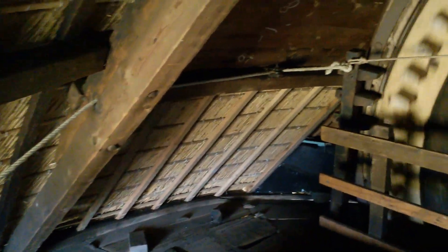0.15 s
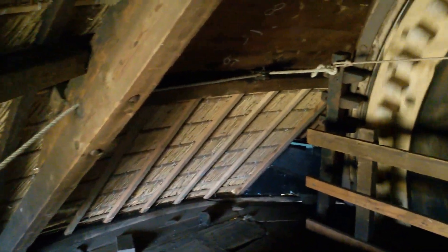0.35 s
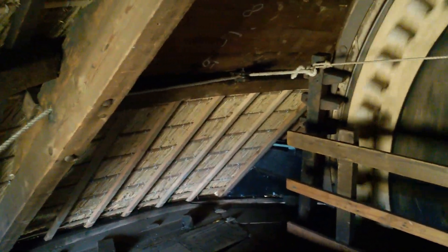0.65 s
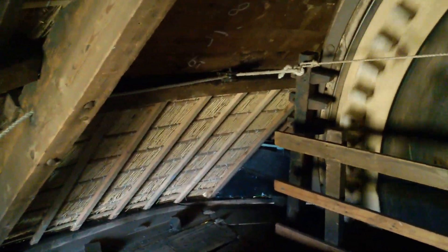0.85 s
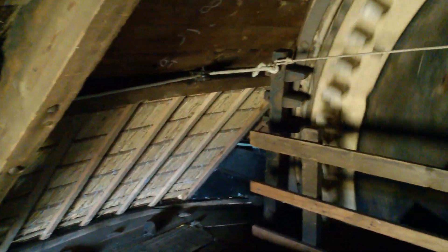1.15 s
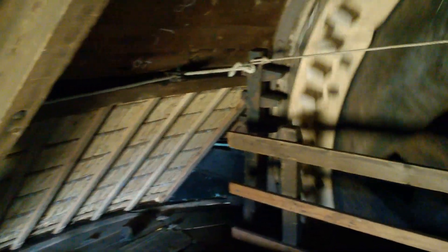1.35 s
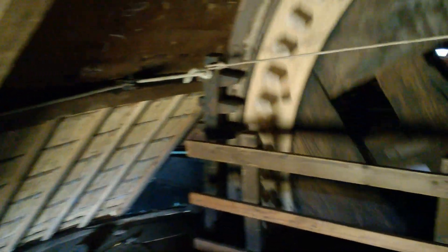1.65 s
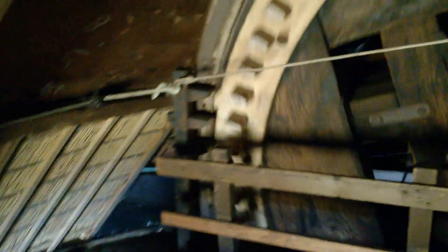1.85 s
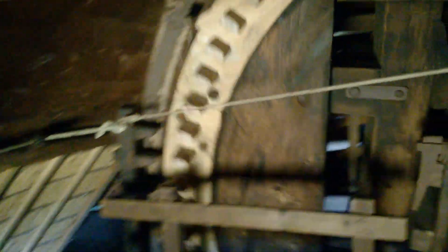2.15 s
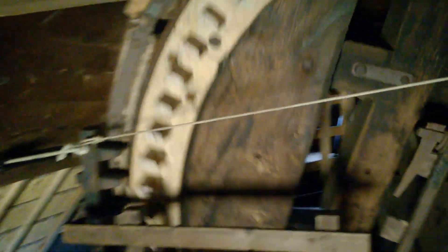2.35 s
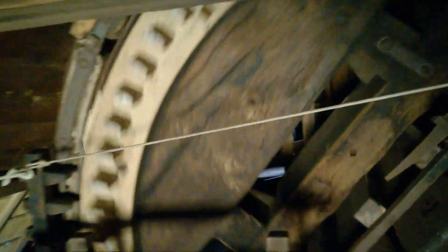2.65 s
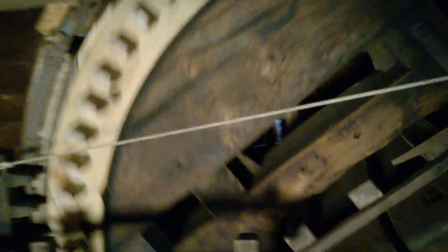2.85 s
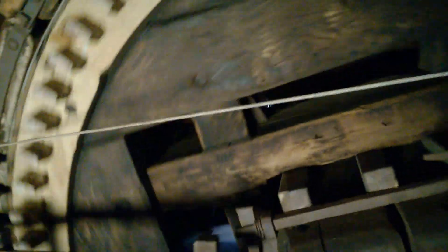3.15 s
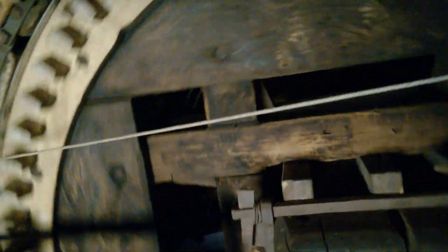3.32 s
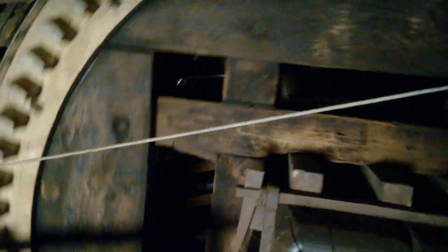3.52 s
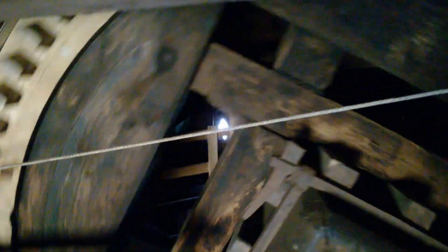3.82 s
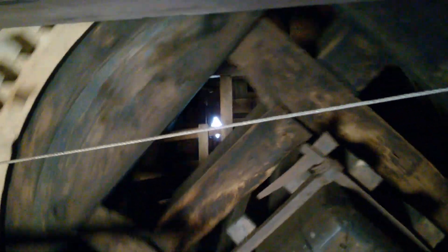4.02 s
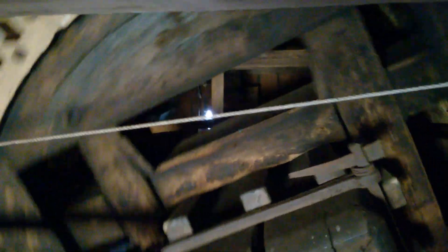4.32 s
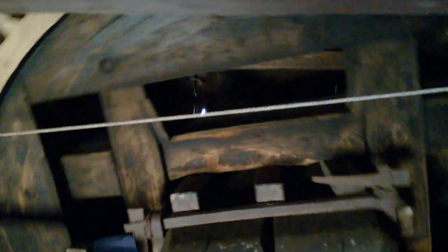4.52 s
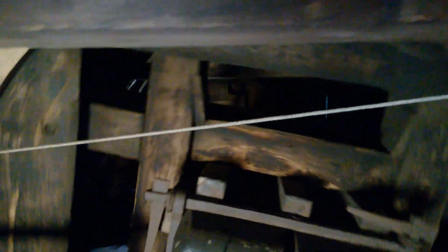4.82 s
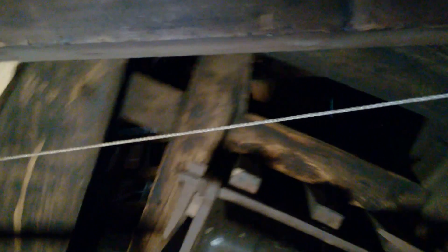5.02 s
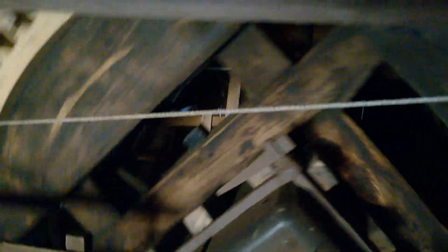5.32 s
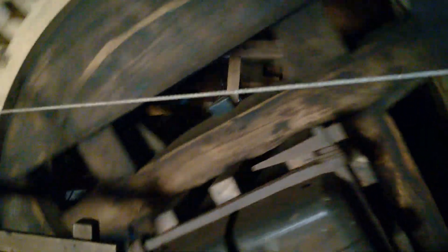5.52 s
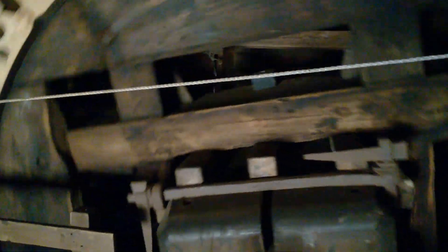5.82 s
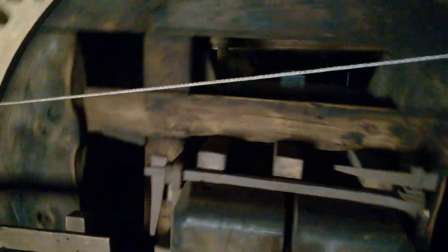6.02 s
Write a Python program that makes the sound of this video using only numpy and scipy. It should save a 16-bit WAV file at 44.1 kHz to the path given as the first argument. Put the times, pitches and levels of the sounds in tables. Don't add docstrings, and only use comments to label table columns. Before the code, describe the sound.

Close, dry wooden gear knocks, ticks and soft low thuds from a turning mill wheel, above a shuddering low-frequency rumble in a small timber loft.

```python
import sys
import numpy as np
from scipy import signal
from scipy.fft import rfft, irfft
from scipy.io import wavfile
from scipy.ndimage import uniform_filter1d

SR = 44100
rng = np.random.default_rng(int(sys.argv[2]) if len(sys.argv) > 2 else 0)


def store_pcm(level_fs):
    pcm = np.round(np.clip(level_fs, -1, 1) * 32767).astype(np.int16)
    wavfile.write(sys.argv[1], SR, np.atleast_2d(pcm).T)


def volts_from_db(level):
    exponent = np.asarray(level, float) / 20
    return 10 ** exponent


N = 272097
SPAN = 8192
LEAD = .002
TIME = np.arange(SPAN) / SR
HZ = np.arange(SPAN // 2 + 1) * SR / SPAN


def unit(x):
    return x / np.sqrt(np.mean(x ** 2))


def walk(rate):
    k = int(SR / rate)
    steps = np.repeat(rng.standard_normal(N // k + 1), k)
    return unit(uniform_filter1d(uniform_filter1d(steps, k), k)[:N])


def shaped(points, size):
    hz, db = np.transpose(points)
    log_hz = np.log(np.arange(size // 2 + 1) * SR / size + 1)
    return irfft(rfft(rng.standard_normal(size)) * volts_from_db(np.interp(log_hz, np.log(hz), db)), size)


def colour_curve(hz, db):
    return volts_from_db(np.interp(np.log(HZ + 1), np.log(hz), db))


def add(out, x, s, db):
    i = int((s - LEAD) * SR)
    top = np.sqrt(2 * uniform_filter1d(x ** 2, SR // 200).max())
    out[i:i + SPAN] += (x * volts_from_db(db) / top)[:N - i]


def wind():
    # time in seconds, load on the tower in dB, sway re load in dB, tooth pressure in dB
    gusts = [(0.0, -26.5, -0.5, -49), (0.41, -25, -3, -45.5), (0.79, -26.5, -4.5, -54),
             (1.29, -19.5, -4, -49.5), (1.67, -31, -4, -43.5), (2.01, -20, -2, -50.5),
             (2.87, -27, -3.5, -50.5), (2.97, -27.5, -4, -47.5), (3.4, -15.5, -8, -52),
             (3.59, -25.5, -1.5, -43), (3.63, -17, -4, -47), (4.33, -32.5, 0, -57), (4.43, -45, -4, -56.5),
             (4.47, -28.5, -1, -48), (4.9, -19, -3.5, -53), (5.19, -29, -5.5, -55), (5.77, -25, -4.5, -48),
             (6.17, -30, -3.5, -57)]
    s, *columns = np.transpose(gusts)
    return [np.interp(np.arange(N) / SR, s, column) for column in columns]


def wavering(hz):
    turns = np.cumsum(hz * (1 + 0.05023 * walk(5))) / SR
    return -np.sqrt(2) * np.cos(2 * np.pi * turns)


def resonate(hz, width):
    peak = signal.tf2sos(*signal.iirpeak(hz, hz / width, fs=SR))
    return unit(signal.sosfilt(np.vstack([peak, peak, peak]), rng.standard_normal(N)))


def tower(load_db, share_db):
    sway_db = load_db + share_db + 3.0 * walk(9.7)
    shudder_db = load_db - 2 + 2.45 * walk(9)
    rumble_db = -37.5 + 0.51 * (load_db + 23) + 3 * walk(8)
    sway = volts_from_db(np.minimum(sway_db, -17)) * wavering(26.5)
    shudder = volts_from_db(np.minimum(shudder_db, -16)) * wavering(37)
    buffet = volts_from_db(-36.5) * resonate(53.0, 27.0)
    rumble = resonate(76, 30) + 0.43 * resonate(122.7, 70)
    return sway + shudder + buffet + volts_from_db(rumble_db - 3.5) * rumble


def aftershake(knocks):
    shake_s, db_per_db = .08, .33
    fade = np.exp(-1 / (shake_s * SR))
    power = signal.lfilter([1 - fade], [1, -fade], knocks ** 2)
    return db_per_db * 10 * np.log10(power / np.median(power) + .1)


def grind(db):
    # frequency in Hz, level in dB per Hz
    rub_colour = [(100, 5.5), (190, 6.5), (350, -5), (700, -11), (1300, -20.5), (2100, -21), (2900, -32),
                  (4200, -37), (6300, -37), (8000, -67)]
    grains = shaped(rub_colour + [(20000, -120)], N) * volts_from_db(1.4 * walk(18) + 2.5 * walk(70))
    grains = signal.sosfilt(signal.butter(2, 340, "high", fs=SR, output="sos"), grains)
    low = [(hz, level) for hz, level in rub_colour if 90 < hz < 500]
    drone = shaped([(38, -18.5), (55, 10.5)] + low + [(720, -47.5)], N)
    hiss = shaped([(1500, 2), (3000, 1.0), (6300, -2.5), (7500, -21.5), (16000, -9.0)], N)
    rubbing = volts_from_db(db - 0.7) * unit(grains)
    droning = volts_from_db(-41.5 + 1.75 * walk(6.05)) * unit(drone)
    return rubbing + droning + volts_from_db(-74.5 + walk(12) / 2) * unit(hiss)


def slip(length, rough_db):
    chatter = rng.standard_normal(SPAN) * volts_from_db(rough_db * rng.exponential(size=SPAN))
    since = np.maximum(TIME - LEAD, 0)
    bite = 1 - np.exp(-since / max(0.06 * length, 1e-5))
    let_go = np.exp(-(since / max(length, 2e-4)) ** 2)
    return rfft(chatter * (TIME >= LEAD) * bite * let_go)


def splinters(hits):
    # start in seconds, peak level in dB, air re edge in dB, slip length in seconds
    ticks = [(.036, -48, -24, 0.0059), (0.146, -52, -20, 0.017), (0.357, -58, -16, .017),
             (.55, -60, -11, .016), (0.623, -59, -14, .012), (1.029, -49, -10.5, 0.01),
             (1.386, -57, -12, .0097), (1.496, -47, -16, .025), (1.517, -50, -13, 0.017),
             (1.605, -52, -11, 0.042), (1.726, -52.5, -12, 0.039), (2.023, -60.5, -27, .014),
             (2.216, -48, -5, 0.019), (2.235, -44.5, -4.5, .035), (2.427, -55.5, -17, 0.026),
             (2.825, -48, -10, .016), (3.401, -59.5, -18, 0.0058), (3.51, -54, -29, .012),
             (3.7115, -55, -22, .023), (3.781, -51, -9.5, 0.016), (3.918, -58, -12, .0094),
             (4.504, -58, -15, .012), (4.57, -48, -11, 0.012), (4.653, -55, -23, .005),
             (5.111, -51.5, -29, .0077), (5.223, -51, -21, .0062), (5.293, -40, -13, 0.016),
             (5.317, -48.5, -5, 0.0053), (5.811, -56, -24, .025)]
    # start in seconds, peak in dB, air re edge in dB, slip in seconds
    snaps = [
        (0.449, -45.5, -12.5, 0.025),
        (1.199, -45, 0, 0.0015),
        (1.8, -54.5, -4.5, 0.00088),
        (3.129, -43.5, -14, 0.00039),
        (5.755, -47.5, -14.5, 0.00089),
    ]
    shed = [(s, min(db + edge_db - 12.5, -45), -17, 0.017) for s, db, _, edge_db, *_ in hits]
    out = np.zeros(N)
    for s, db, air_db, length in ticks + snaps + shed:
        crack = colour_curve([2760, 5750, 8000, 12500, 16000], [-25, 0, -3.5, air_db, 2.1 * air_db])
        add(out, irfft(slip(length, rough_db=4.5) * crack), s, db - 4.5)
    return out


def blows():
    # start in seconds, peak in dB, edge re mid in dB
    glancing = [(0.0685, -38, -1.5), (0.335, -38, -25), (0.3587, -34.5, -11), (.427, -37, -12),
                (0.6277, -44, -13), (1.0384, -43.5, 0.3), (1.145, -45, -1.1), (1.378, -50.5, -8),
                (1.469, -41, -1), (1.561, -32.5, -14), (1.629, -39, 3), (1.675, -56, -3), (1.888, -45, -5),
                (1.975, -57, 3), (2.2477, -33, -8), (2.283, -34, -8), (2.713, -46, 4),
                (3.295, -41.5, -15.5), (3.508, -43, -18), (4.637, -40.5, -10), (5.004, -53, 0),
                (5.2245, -43, -8), (5.617, -46, -6)]
    # start in seconds, peak in dB, body re mid in dB, edge re mid in dB, ring in Hz
    hard = [(.15, -33, -10.5, -16.5, 980), (0.4492, -14.5, -2, -2.5, 2500), (.833, -42, 7.5, -10.5, 1150),
            (1.488, -29.5, -1.5, -10.5, 2120), (1.6, -31.5, 1.5, -10, 910), (1.73, -26.5, 0, -9, 1260),
            (2.167, -33.5, 0.5, -4.5, 1040), (2.2268, -30, -2, 1, 1980), (2.3183, -22.5, 0.5, -15.5, 770),
            (2.639, -35.5, -3, -8, 1800), (2.823, -30, -5, -8, 2100), (3.094, -14.5, -1.5, -32, 1290),
            (3.762, -35.5, 6, -4.5, 1040), (3.9601, -35, 4.5, -1.5, 1830), (4.208, -39, 4, 0.5, 1950),
            (4.287, -38, 8.5, -26, 1840), (4.5704, -29, 3.3, -6, 802), (4.77, -31.5, 3, -2.5, 1900),
            (5.2961, -29, 8, -6, 1140), (5.489, -29, 1.5, -22, 1400), (5.6294, -15, 0.5, -1, 2077),
            (5.7071, -30.5, 1.5, -22.5, 1790), (5.775, -26, 1.5, -8.5, 743), (5.967, -37.5, -1.1, -6, 900)]
    # start in seconds, peak in dB, edge re mid in dB
    seating = [(.204, -41.5, -15), (0.5376, -39.5, -16), (.667, -51, -9), (1.195, -46, -4), (1.3, -37, -29),
               (1.5264, -37, -6), (2.06, -59.5, -18), (2.543, -53, -14), (2.9067, -39.5, -16),
               (2.951, -43.5, -14), (3.043, -46.5, -27), (3.217, -50, -3.5), (3.3571, -42, -9),
               (3.415, -41, -8), (3.5617, -40.5, -6), (3.573, -33.5, -24), (3.6007, -32, -16),
               (3.6419, -28.5, -20.5), (3.675, -33.5, -36), (3.924, -47.5, -5), (4.043, -38, -30),
               (4.426, -53, -25), (4.485, -45, -13), (4.88, -44, -14), (5.1163, -44.5, -7),
               (5.2056, -47, -12), (5.3622, -39.5, -24), (5.733, -36, -12), (5.8174, -32.5, -10.5),
               (6.0784, -43.5, -29)]
    seat_hz, glance_hz = 900 * 2 ** (.4 * rng.standard_normal((2, 30)))
    hits = []
    for s, db, body_db, edge_db, hz in hard:
        ring_db = -.15 * (edge_db + 12)
        slip_s = 0.021 + .0003 * (db + 30)
        hits.append((s, db, body_db, edge_db, hz, ring_db, slip_s))
    for (s, db, edge_db), hz in zip(seating, seat_hz):
        hits.append((s, db, 5.5, edge_db, hz, -6, 0.029))
    for (s, db, edge_db), hz in zip(glancing, glance_hz):
        hits.append((s, db, -6.5, edge_db, hz, -6, 0.021))
    return hits


def modes(hz, gain, t60):
    low = HZ[:SPAN // 4]
    damping = np.log(1000) / t60[:, None]
    response = (gain[:, None] / (damping + 2j * np.pi * (low - hz[:, None]))).sum(axis=0)
    return np.pad(response / np.median(np.abs(response)), (0, len(HZ) - len(low)))


def cogs(hits):
    count = 50
    order = np.arange(count)
    out = np.zeros(N)
    for s, db, body_db, edge_db, ring_hz, ring_db, length in hits:
        crowd_hz = 270 * 2 ** ((order + 0.65 * rng.random(count)) / 10)
        crowd_gain = (-1) ** order * volts_from_db(1.5 * rng.standard_normal(count)) * (crowd_hz / ring_hz) ** .9
        crowd_t60 = .013 * (1000 / crowd_hz) ** 1.2
        hz = np.append(crowd_hz, ring_hz)
        gain = np.append(crowd_gain, 2.4 * volts_from_db(ring_db))
        t60 = np.append(crowd_t60, 0.008 * (1000 / ring_hz) ** 1.5)
        wood = 4.2 + modes(hz, gain, t60)
        colour = colour_curve([200, 450, 750, 1500, 3000, 5500, 9000, 14000],
                              [body_db - 16, body_db + 5.5, body_db, 0,
                               0.6 * edge_db - 0.5, edge_db - 6.5, edge_db - 32.5, edge_db - 44.5])
        blow = irfft(slip(length, rough_db=2.5) * wood * colour)
        add(out, blow, s, db + max(body_db, edge_db, 0) - 5.0)
    return out


def scrapes():
    # start in seconds, length in seconds, level in dB, edge brightness in dB
    drags = [
        (.1, .25, -56, -20),
        (1.17, .13, -59, -16),
        (1.465, .18, -51, -9),
        (2.17, .15, -53, -6),
        (2.88, .12, -53, -18),
        (3.58, .1, -44, -34),
        (5.77, .07, -48, -14),
    ]
    attack_s, release_s = .008, .022
    t = np.arange(N) / SR
    body = unit(shaped([(200, -30), (380, 0), (900, -6), (2200, -14), (4000, -28), (16000, -70)], N))
    edge = unit(shaped([(1200, -25), (2500, -1.5), (5500, -4), (8000, -20), (16000, -40)], N))
    out = np.zeros(N)
    for s, length, db, edge_db in drags:
        start = np.clip((t - s) / attack_s, 0, 1)
        let_go = np.exp(-np.maximum(t - s - length, 0) / release_s)
        out += start * let_go * volts_from_db(db) * (body + volts_from_db(edge_db) * edge)
    return out * volts_from_db(4.5 * walk(60) + 2.1 * walk(400))


def echoes():
    # frequency in Hz, time to fall 60 dB in seconds
    decay = [(200, 0.19), (530, 0.18), (1400, 0.16), (3700, 0.18), (9700, 0.13)]
    hz, t60 = np.transpose(decay)
    f, t, cells = signal.stft(rng.standard_normal(3 * SPAN), SR, nperseg=128)
    fade = np.exp(-np.log(1000) * t / np.interp(np.log(f + 1), np.log(hz), t60)[:, None])
    tail = signal.istft(cells * fade, SR, nperseg=128)[1]
    tail = tail * (1 - np.exp(-np.arange(len(tail)) / SR / 0.012))
    return tail / np.sqrt(np.sum(tail ** 2))


def loft(x):
    places, place_s = 5, .09
    place = (np.arange(N) / SR / place_s).astype(int) % places
    wet = sum(signal.fftconvolve(x * (place == k), echoes())[:N] for k in range(places))
    return x + volts_from_db(-5.5) * wet


def beam():
    # start in seconds, peak level in dB, pitch in Hz, push length in seconds
    thumps = [(0.18, -38, 191, 0.02), (0.647, -29, 174, 0.0053), (0.99, -31, 100, 0.02),
              (1.063, -31.5, 132, 0.0078), (1.3, -35, 265, 0.012), (2.84, -37, 250, 0.012),
              (1.7, -35, 122, 0.02), (3.77, -27, 68, 0.02), (5.76, -35, 175, .02),
              (1.309, -28.5, 169.5, 0.016), (1.371, -33.5, 123.6, 0.02), (1.604, -36, 183.6, 0.017),
              (1.986, -40, 116.4, 0.013), (2.195, -41.5, 165, 0.007), (2.427, -45, 126, 0.02),
              (2.677, -28, 189, 0.0058), (3.442, -43, 123, 0.011), (3.572, -27, 184, 0.012),
              (3.611, -18, 182.6, 0.024), (3.669, -21, 185.5, 0.007), (4.06, -30.5, 187, 0.0053),
              (4.5, -29.5, 182, 0.015), (4.59, -28.5, 186.3, 0.0097), (4.781, -27, 176.5, 0.018),
              (4.851, -21.5, 181, 0.022), (5.063, -26, 183, 0.022), (5.303, -27.5, 124, 0.016),
              (5.442, -26.5, 185, 0.019), (5.865, -36.5, 171, 0.0087), (5.975, -33.5, 170.3, 0.045)]
    t60 = 0.24
    fade = np.exp(-np.log(1000) * TIME / t60) * np.cos(np.pi / 2 * TIME * SR / SPAN)
    out = np.zeros(N)
    for s, db, hz, length in thumps:
        rise = 1 - np.exp(-TIME / max(length, .002))
        phase = 2 * np.pi * hz * TIME
        note = np.sin(phase) + 0.12 * np.sin(1.36 * phase) + 0.08 * np.sin(2.22 * phase)
        add(out, rise * note * fade, s, db + 0.5)
    return out


def scene():
    load_db, share_db, pressure_db = wind()
    hits = blows()
    knocks = cogs(hits)
    rubbing = grind(pressure_db + 2.5 + aftershake(knocks))
    mesh = loft(knocks + splinters(hits) + scrapes())
    return (tower(load_db, share_db) + rubbing + mesh + beam())[None]


def low_pass(x):
    return signal.sosfilt(signal.butter(12, 15800, fs=SR, output="sos"), x)


def record(dry):
    heard = signal.sosfilt(signal.butter(1, 12, "high", fs=SR, output="sos"), dry)
    return low_pass(heard)


dry = scene()
out = record(dry)
store_pcm(out)
```